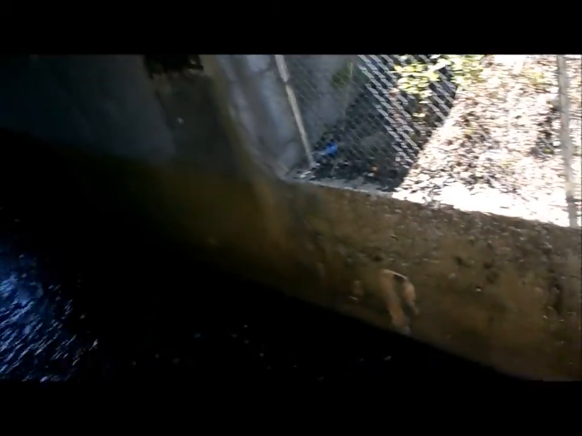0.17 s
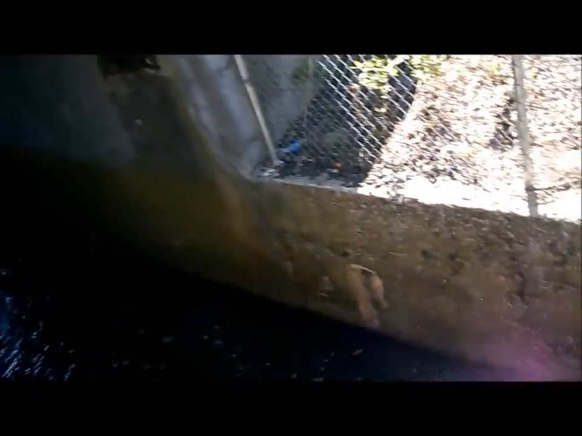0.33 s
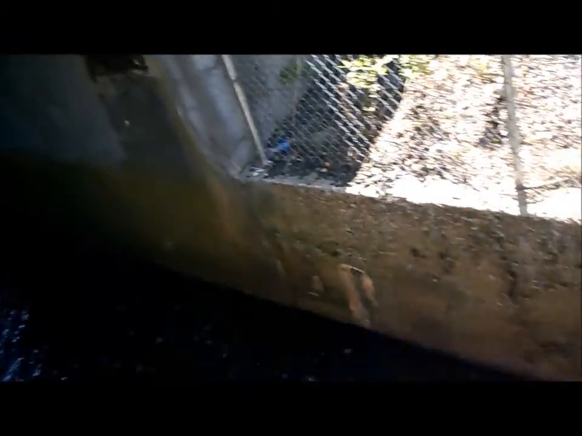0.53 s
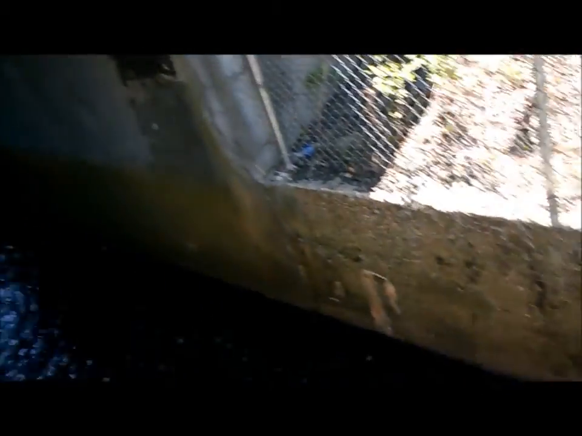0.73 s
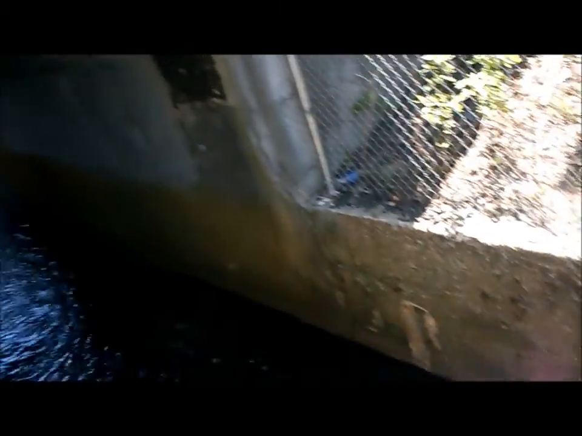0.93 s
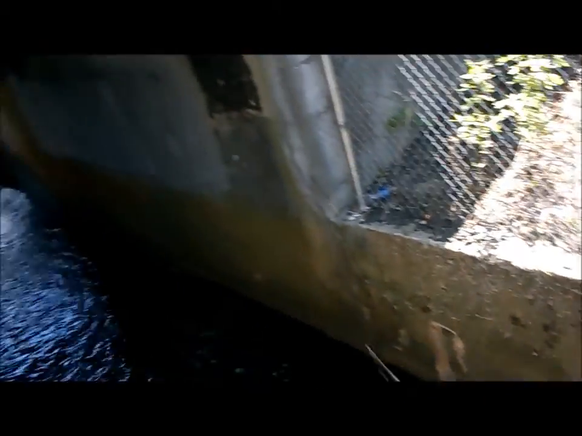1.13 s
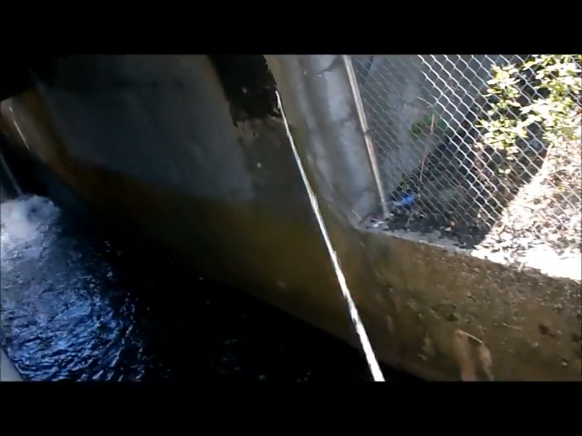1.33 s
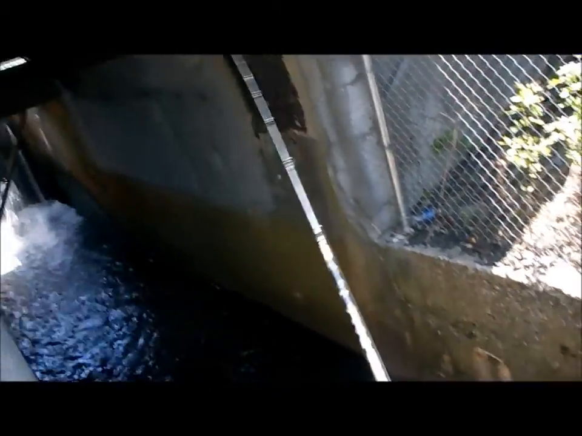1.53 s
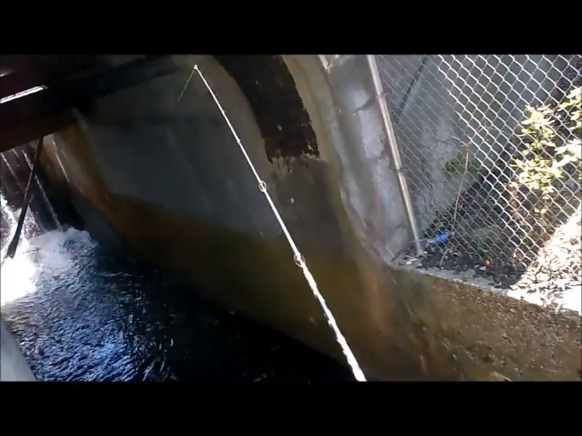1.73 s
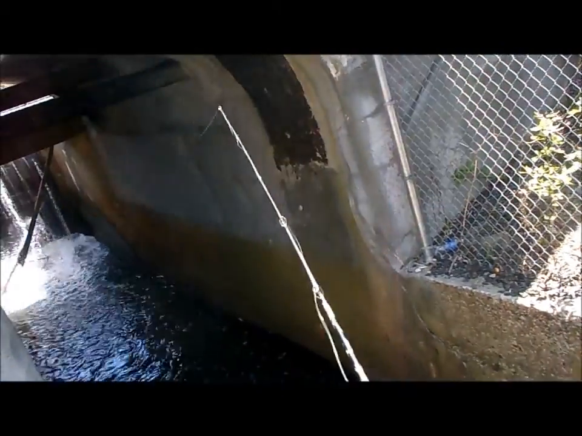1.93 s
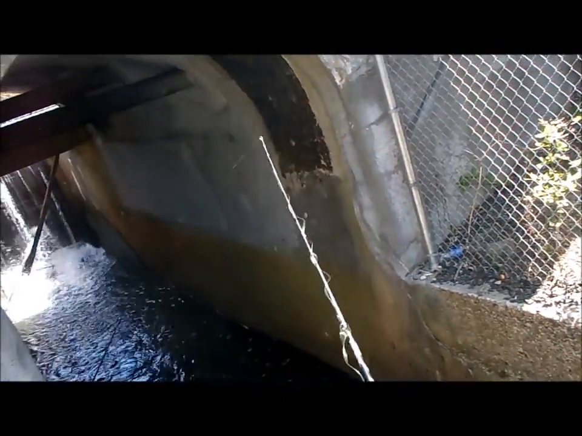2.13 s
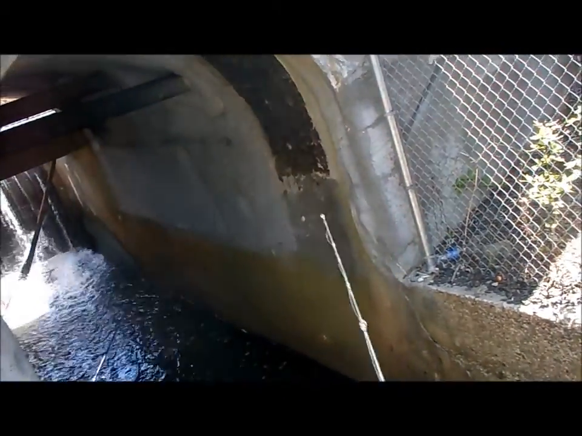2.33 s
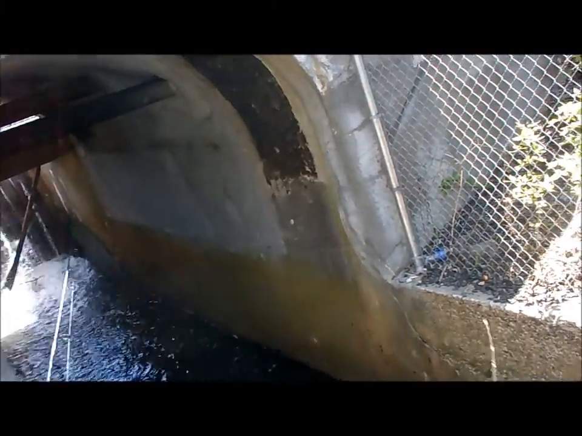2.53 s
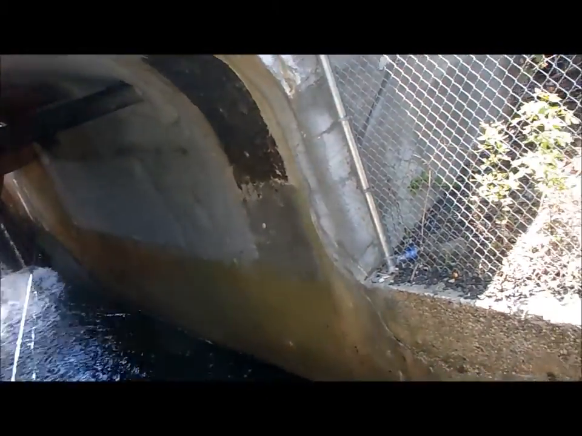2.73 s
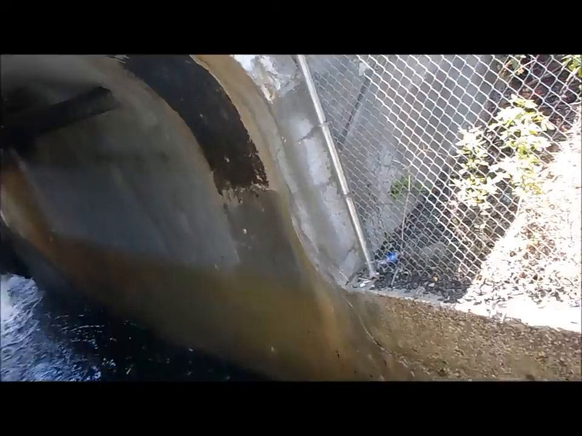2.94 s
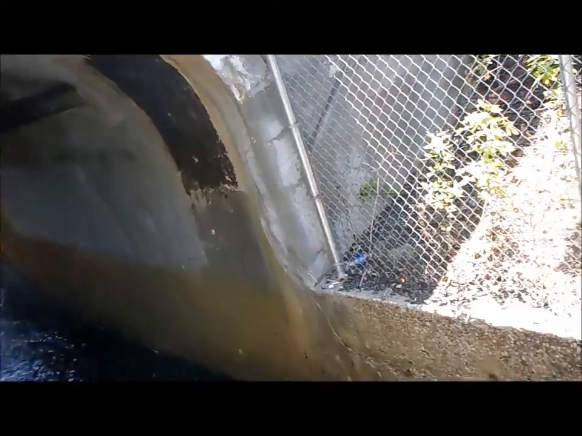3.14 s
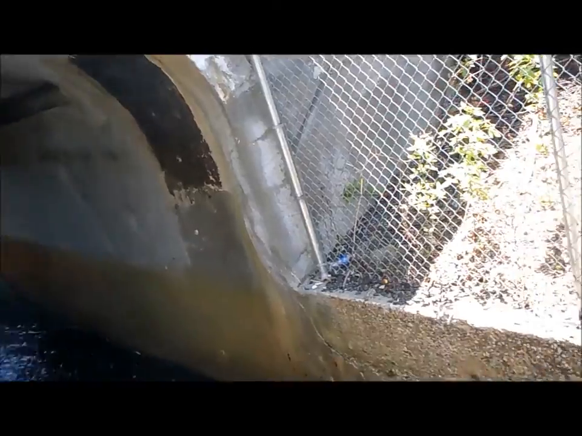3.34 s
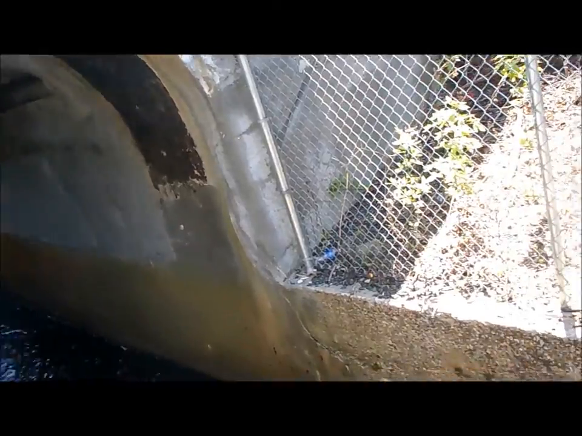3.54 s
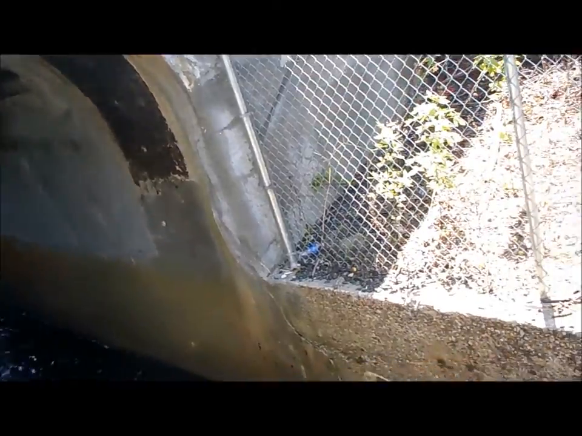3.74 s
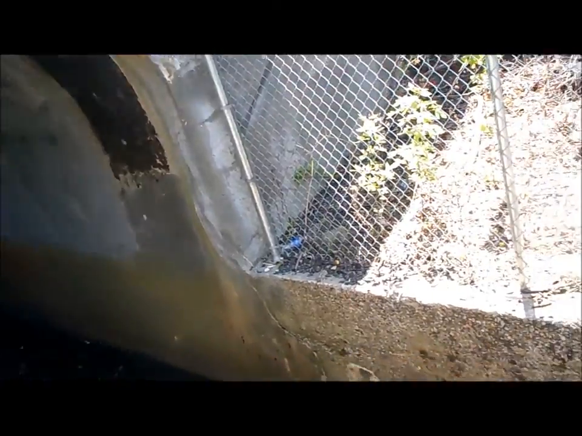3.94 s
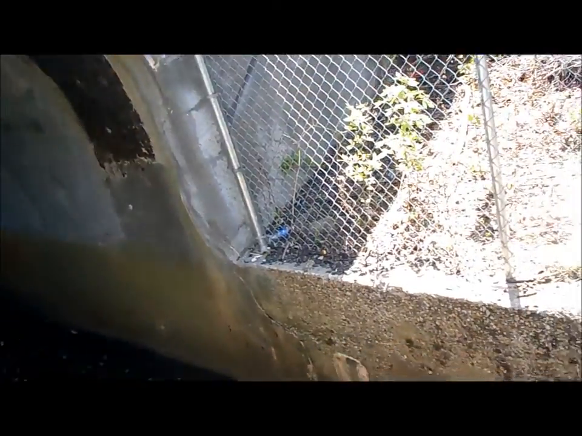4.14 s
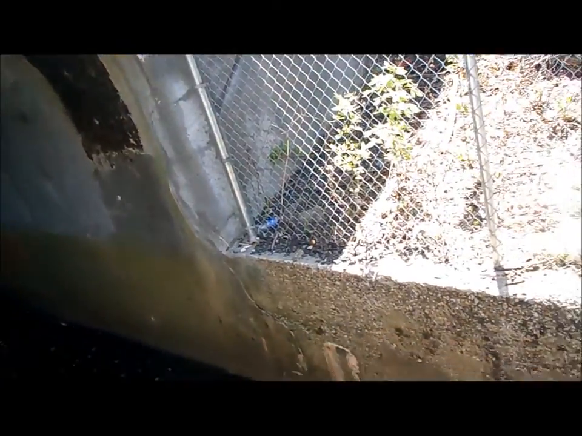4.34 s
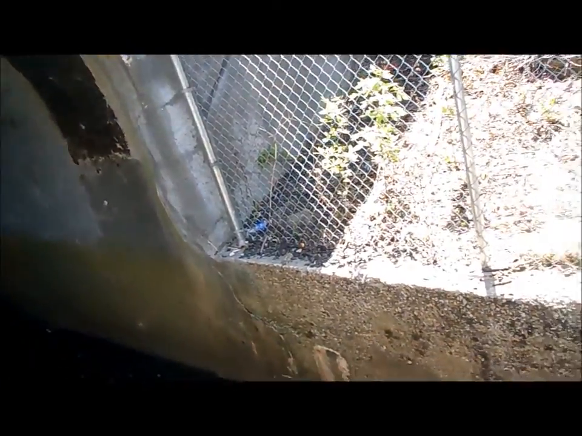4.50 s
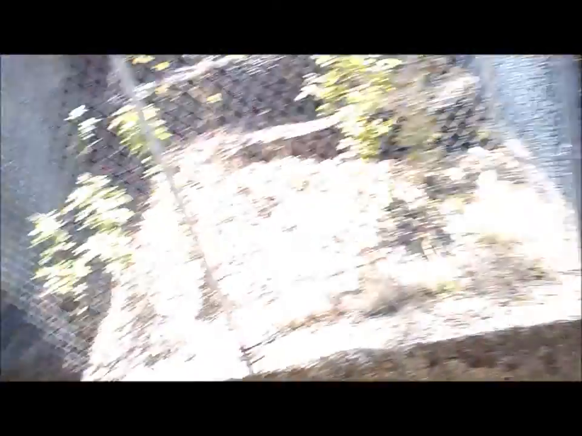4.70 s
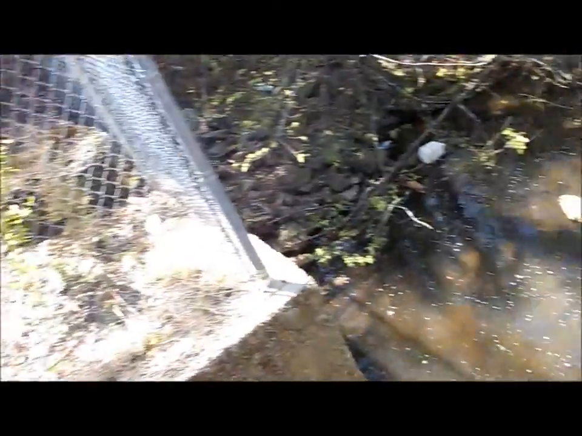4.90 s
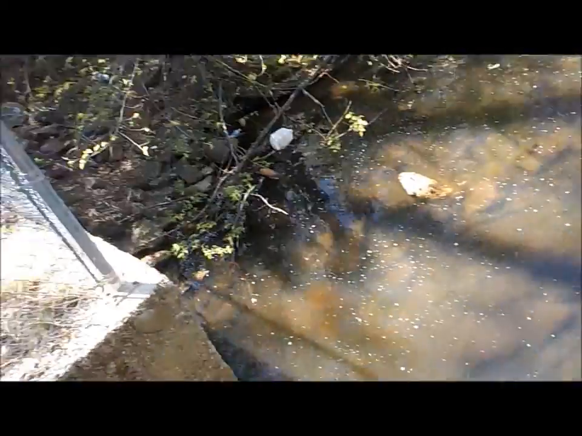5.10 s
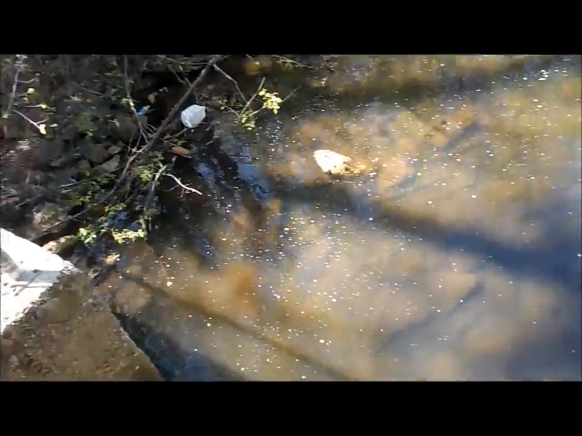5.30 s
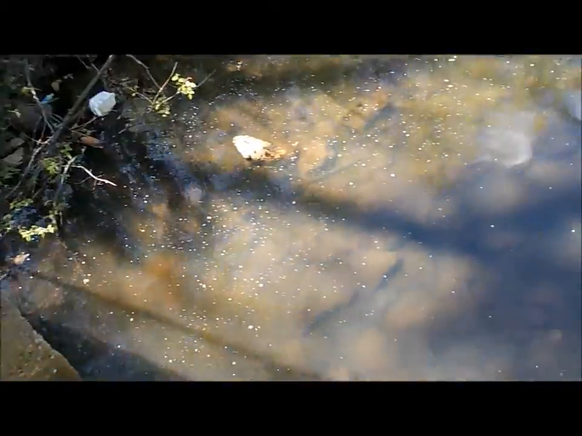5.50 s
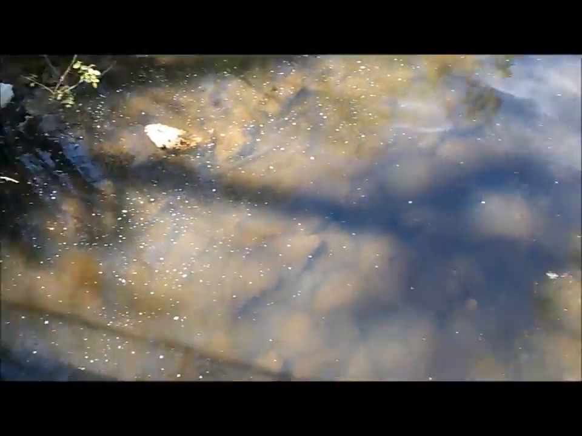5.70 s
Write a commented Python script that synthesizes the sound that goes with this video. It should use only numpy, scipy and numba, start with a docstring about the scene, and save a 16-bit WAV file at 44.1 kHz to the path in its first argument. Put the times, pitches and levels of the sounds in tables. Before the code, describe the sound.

Water falls steadily into a pool inside a concrete culvert, a dense bright wash that turns duller near the end with a few hollow glugs.

```python
"""Water drops over a ledge into a pool inside a concrete culvert, heard from the channel at its mouth.
Throughout, big bubbles gurgle, swarms of small ones fizz and drops patter, each bubble a decaying resonance;
the walls smear them into a wash of noise. Near 2 s spray hisses and a large bubble glugs; at 3.3 s spray again.
From 4.7 s the single microphone turns away downstream and the treble falls into its shadow.
After 5.3 s four more large bubbles glug."""
import sys
import numpy as np
from scipy import signal
from scipy.fft import rfft, irfft
from scipy.io import wavfile
from scipy.ndimage import uniform_filter1d
from numba import njit

SR = 44100
rng = np.random.default_rng(int(sys.argv[2]) if len(sys.argv) > 2 else 0)


def materialize(psi):
    """Save the field psi as 16-bit PCM at rate SR to the path in sys.argv[1].

    A 1-D psi becomes a single channel; in a 2-D psi each row is a channel.
    """
    bounded = np.clip(np.atleast_2d(psi).T, -1, 1)
    quanta = np.round(bounded * 32767).astype(np.int16)
    wavfile.write(sys.argv[1], SR, quanta)


N = 254016
TIME = np.arange(N) / SR

CULVERT_T60_S = 0.86
POOL_DB = -28
SPLASH_DB, SPLASH_FADE_DB_PER_S = -15, 0.21  # level at the start, and how it slowly eases
TURN_START_S, TURN_SETTLE_S = 4.735, 0.19  # start of the turn and its time constant
LOW_HZ, TOP_HZ = 92, 10700  # band limits of the recorder


def undb(db):
    """Decibels are logarithmic: 20 dB is a factor of ten in amplitude."""
    return 10 ** (np.asarray(db) / 20)


def unit(x):
    """Normalise the mean power, so that the rms is 1."""
    return x / np.sqrt(np.mean(x ** 2))


def colour(x, points):
    """Linear filtering: weight the spectrum by (Hz, dB) points joined on a log-frequency axis."""
    hz, db = np.transpose(points)
    bins = np.maximum(np.arange(N // 2 + 1) * SR / N, 1)
    gain = undb(np.interp(np.log(bins), np.log(hz), db))
    return irfft(rfft(x) * gain, N)


def walk(rate):
    """Low-pass random fluctuation: Gaussian levels held 1 / rate s, then smoothed to rms 1."""
    hold = max(int(SR / rate), 2)  # samples
    held = rng.standard_normal(N)[np.arange(N) // hold]
    smooth = uniform_filter1d(held, hold)
    return unit(uniform_filter1d(smooth, hold // 2))


@njit
def ring(start, hz, size, cycles, rise):
    """Damped resonance: a bubble decays 60 dB over some cycles, its pitch climbing as it nears the surface."""
    out = np.zeros(N)
    for k in range(len(start)):
        first = int(start[k] * SR)
        length = int(cycles * SR / hz[k])
        step = 2 * np.pi * hz[k] / SR
        pole = np.exp(1j * step - np.log(1000) / length)
        glide = np.exp(1j * step * rise / length)  # rise is the fractional climb over the ring
        z, swell = size[k] + 0j, 0.
        for i in range(first, min(first + length, N)):
            z *= pole
            pole *= glide
            swell += (1 - swell) * hz[k] / SR  # it takes about a cycle to pinch off
            out[i] += swell * z.imag
    return out


def swarm(low_hz, high_hz, per_s, cycles, rise, spread_db, clump_db, clump_rate):
    """Superposed resonances: bubbles of all sizes, born at random, louder in clumps; equal power per Hz."""
    when, pitch, force, sign = rng.random((int(per_s * N / SR), 4)).T
    hz = low_hz * (high_hz / low_hz) ** pitch
    clump = clump_db * walk(clump_rate)[(when * N).astype(int)]
    polarity = np.sign(sign - .5)
    # pitches are even per octave and high bubbles ring shorter; size in proportion to hz evens the power
    size = hz * undb(spread_db * force + clump) * polarity
    return unit(ring(when * N / SR, hz, size, float(cycles), float(rise)))


def culvert(x, points, wet_db):
    """Diffuse reverberation: reflections merge into a noise wash that follows the decaying energy."""
    keep = np.exp(-np.log(1e6) / (CULVERT_T60_S * SR))  # energy kept per sample
    # the initial state starts the sound in an already filled culvert
    energy = signal.lfilter([1 - keep], [1, -keep], unit(x) ** 2, zi=[1])[0]
    wash = unit(colour(rng.standard_normal(N), points)) * np.sqrt(energy)
    return unit(unit(x) + undb(wet_db) * wash)


def pool():
    """Volume resonance: big bubbles ring low and gurgle in the turbulence under the fall."""
    # colour of the churning pool: pitch_hz, level_db
    pool_colour = [(26, -84), (45, -54), (204, -25), (300, -20.5), (423, -10.5), (948, -5), (1300, -6),
                   (1600, -4.5), (2080, -16.5), (3520, -120)]
    gurgle = swarm(150.4, 1793, per_s=1400, cycles=34.3, rise=0.19, spread_db=12.5, clump_db=0.05, clump_rate=12)
    return undb(POOL_DB) * culvert(colour(gurgle, pool_colour), pool_colour, wet_db=2.5)


def spurts():
    """Impact noise: stray spray hits the surface with a short bright hiss of fast attack and slower decay."""
    # spurts of spray: start_s, level_db, decay_s
    spurt_table = [(2.026, -30, 0.053), (3.263, -38, .018)]
    envelope = np.zeros(N)
    for start_s, level_db, decay_s in spurt_table:
        age = np.maximum(TIME - start_s, 0) / decay_s
        envelope += undb(level_db) * (1 - np.exp(-20 * age)) * np.exp(-age)
    hiss_colour = [(2000, -30), (5000, 2), (10000, -6), (11500, -20)]  # Hz, dB
    return envelope * unit(colour(rng.standard_normal(N), hiss_colour))


def glugs():
    """Single resonances: now and then one large bubble stands out as a decaying tone."""
    # single large bubbles: start_s, level_db, pitch_hz
    glug_table = [(2.17, -27, 482), (5.305, -32, 424), (5.46, -24, 432), (5.63, -18.5, 740),
                  (5.665, -21.5, 620)]
    start_s, level_db, pitch_hz = np.transpose(glug_table).astype(float).copy()
    return ring(start_s, pitch_hz, undb(level_db), 46.0, 0.035)


def splash():
    """Resonance and impact noise: small bubbles fizz and drops patter as the sheet of water slaps unevenly."""
    # colour of the splash: pitch_hz, level_db
    splash_colour = [(760, -46), (1300, -20), (1450, -17.5), (1590, -10.5), (2460, 0), (2760, -6),
                     (3070, -5), (4000, -18), (4870, -15.5), (7510, -29.5), (9710, -30), (10200, -32.5),
                     (10800, -42.5), (14000, -65), (22000, -120)]
    fizz = swarm(1193, 11020, per_s=10000, cycles=37, rise=0.037, spread_db=12.5, clump_db=0.5, clump_rate=45)
    drops = rng.standard_normal(N) * undb(2.5 * rng.standard_normal(N))  # noise of uneven force
    patter = undb(-2.0) * unit(colour(drops, splash_colour))
    water = unit(colour(fizz, splash_colour)) + patter
    slap = undb(0.57 * walk(60))
    level = undb(SPLASH_DB - SPLASH_FADE_DB_PER_S * TIME)
    return culvert(water * slap, splash_colour, wet_db=0.0) * level


def scene():
    """Directivity: the turn, fast at first and then slower, shades the fall but not the glugs; channels alike."""
    # shadow when fully turned: pitch_hz, level_db
    shadow = [(500, -0.5), (1100, 1.5), (1700, -2.5), (2500, -6.5), (3400, -5), (4500, -6.5), (6300, -8.5),
              (8500, -4.5), (10500, -5)]
    fall = pool() + splash() + spurts()
    turn = 1 - np.exp(-np.maximum(TIME - TURN_START_S, 0) / TURN_SETTLE_S)  # 0 facing, 1 turned
    shaded = (1 - turn) * fall + turn * colour(fall, shadow)
    heard = shaded + glugs()
    return np.array([heard, heard])


def record(dry):
    """Band limiting: the recorder drops the deep bass and cuts the top steeply."""
    bass_cut = signal.butter(3, LOW_HZ, "high", fs=SR, output="sos")
    top_cut = signal.ellip(8, .2, 70, TOP_HZ, fs=SR, output="sos")  # .2 dB ripple, 70 dB stopband
    thin = signal.sosfilt(bass_cut, dry)
    return signal.sosfilt(top_cut, thin)


dry = scene()
out = record(dry)
materialize(out)
```